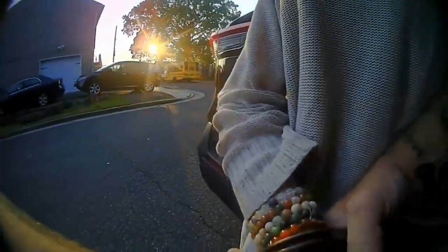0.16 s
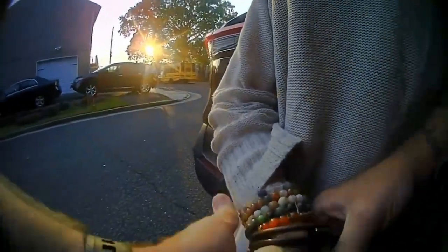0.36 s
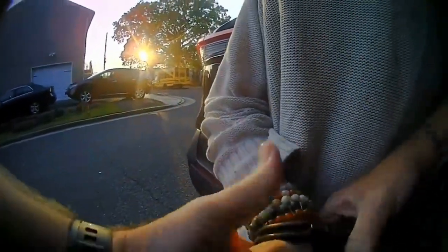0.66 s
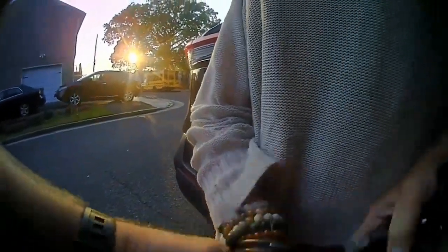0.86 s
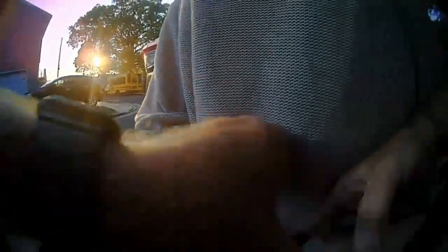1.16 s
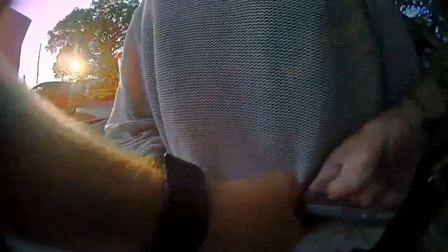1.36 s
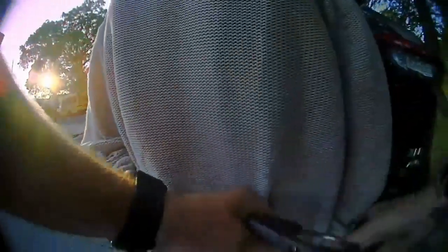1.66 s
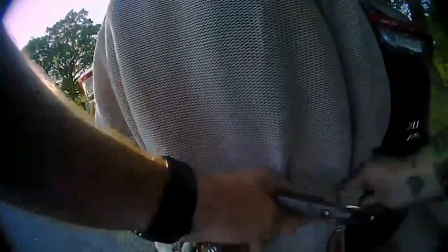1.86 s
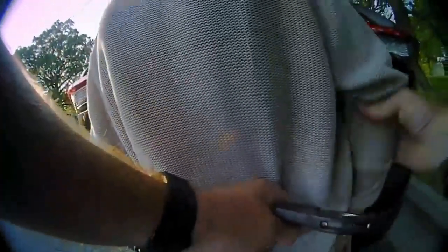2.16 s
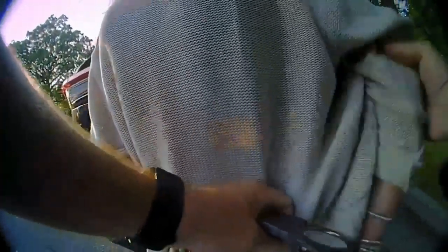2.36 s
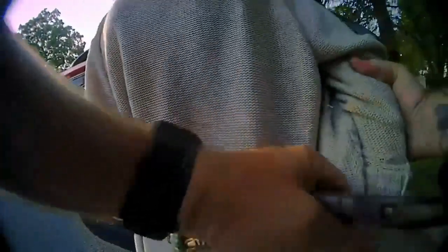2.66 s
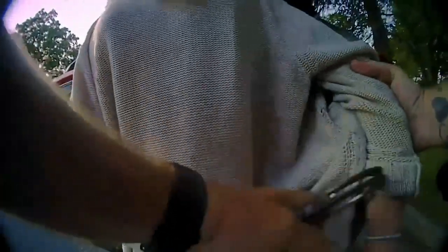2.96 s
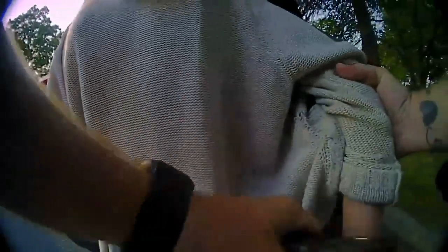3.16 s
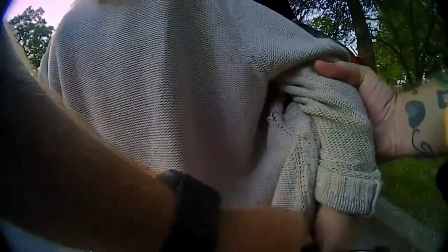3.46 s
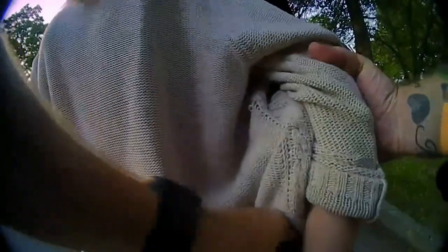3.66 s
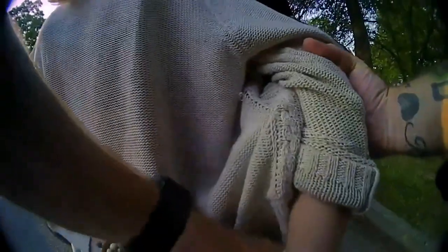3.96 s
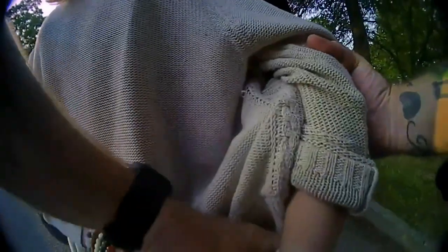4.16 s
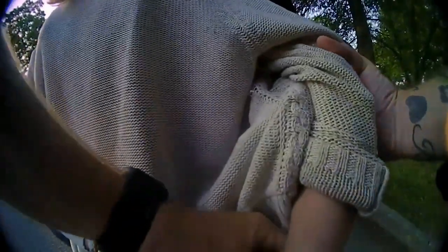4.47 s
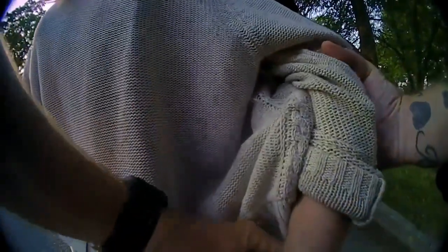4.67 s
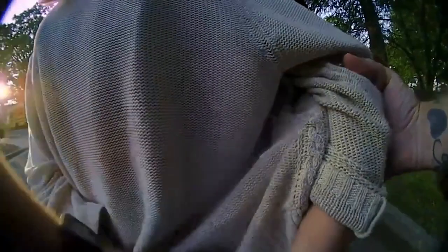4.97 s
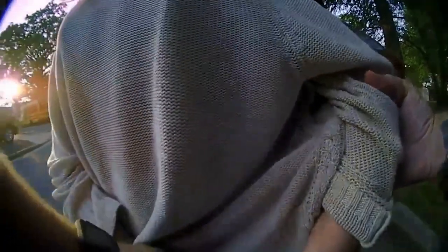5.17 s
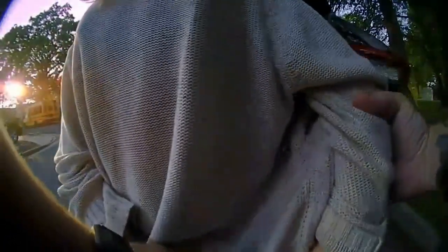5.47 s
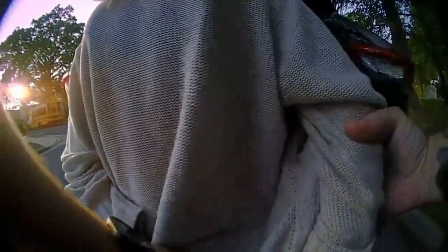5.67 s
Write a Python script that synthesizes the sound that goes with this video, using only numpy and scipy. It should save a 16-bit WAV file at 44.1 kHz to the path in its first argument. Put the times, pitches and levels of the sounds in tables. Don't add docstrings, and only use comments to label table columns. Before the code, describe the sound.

Close, bright metal ratcheting snaps over faint traffic, followed by a jingling chain, a lock click, tapping buckles and tiny bird chips.

```python
import sys
import numpy as np
from scipy import signal
from scipy.io import wavfile
from scipy.ndimage import uniform_filter1d, minimum_filter1d

SR = 44100
rng = np.random.default_rng(int(sys.argv[2]) if len(sys.argv) > 2 else 0)


def level_to_linear(level):
    exponent = np.asarray(level, float) / 20
    return 10 ** exponent


def put_to_file(sound):
    columns = np.atleast_2d(sound).T
    safe = np.clip(columns, -1, 1)
    whole_steps = np.round(safe * 32767)
    wavfile.write(sys.argv[1], SR, whole_steps.astype(np.int16))


N = 256431
NOW = np.arange(N) / SR

# f/Hz, level/dB, t60/s
STEEL_MID = [(3620, -16.5, 0.014), (3920, -23, 0.0017), (4400, -6.5, 0.011), (5320, -1.5, .006),
             (6180, 2.5, 0.0023), (7400, -12, 0.0068)]
STEEL_TOP = [(9400, -1.5, 0.0019), (11900, -3.5, 0.0092), (11550, -1, 0.0012), (11830, -24.5, .025),
             (13200, -9, 0.0017), (15000, -3.5, 0.0013), (15260, -3, 0.0045)]
# start t/s, end t/s, rms level/dB
SLIDES = [
    (2.117, 2.184, -45),
    (2.333, 2.347, -25.5),
    (2.806, 2.905, -37.5),
]


def rms_one(x):
    return x / np.sqrt(np.mean(x ** 2) + 1e-20)


def in_time(rows):
    s, *columns = np.transpose(rows)
    return [np.interp(NOW, s, c) for c in columns]


def passages(rows, fade):
    on = sum(level_to_linear(level_db) * (NOW > start) * (NOW < end) for start, end, level_db in rows)
    return uniform_filter1d(on, size=fade)


def band_pass(x, order, low_hz, high_hz):
    return signal.sosfilt(signal.butter(order, [low_hz, high_hz], "band", fs=SR, output="sos"), x)


def small_source(x, hz):
    return signal.sosfilt(signal.butter(3, hz, "high", fs=SR, output="sos"), x)


def add(out, s, sound, peak_db):
    i = round(s * SR)
    out[i:i + len(sound)] += (level_to_linear(peak_db) * sound / np.abs(sound).max())[:N - i]


def drift(rate):
    r = np.exp(-80 * np.pi * rate / SR)
    chance = rng.standard_normal(N // 40 + 2002)
    slow = signal.lfilter([1], [1, -2 * r, r * r], chance)[2000:]
    return np.interp(np.arange(N) / 40, np.arange(len(slow)), rms_one(slow))


def narrow_noise(hz, width_hz):
    r, w = np.exp(-np.pi * width_hz / SR), 2 * np.pi * hz / SR
    poles = [1, -2 * r * np.cos(w), r * r]
    once = signal.lfilter([1, 0, -1], poles, rng.standard_normal(N))
    return rms_one(signal.lfilter([1, 0, -1], poles, once))


def banded_noise(spectrum, patchy_db, source):
    hz, level_db = np.transpose(spectrum)
    edges = hz[0] * 2 ** np.arange(0, np.log2(hz[-1] / hz[0]) + .01, 1 / 3)
    out, together = 0, drift(4.95)
    for k, (low, high) in enumerate(zip(edges, edges[1:])):
        band = band_pass(source[k % 2], 2, low, high)
        centre_db = np.interp(np.log(low * high) / 2, np.log(hz), level_db)
        flicker_db = patchy_db * (1.15 * together + drift(23.0))
        out = out + level_to_linear(centre_db + flicker_db) * band
    return rms_one(out)


def fibres(per_s, spread_db, share):
    born = rng.random(N) < per_s * level_to_linear(4.0 * drift(15.0)) / SR
    sizes = born * level_to_linear(spread_db * np.minimum(rng.exponential(1, N), 3))
    decay = np.exp(-1 / (.0013 * SR))
    crackle = signal.lfilter([1], [1, -decay], sizes) * rng.standard_normal((2, N))
    return rng.standard_normal((2, N)) + share * rms_one(crackle)


def modes(table, t):
    spread_db, detune = 2.0, .015
    hz, level_db, t60 = np.transpose(table)[:, :, None]
    luck = rng.standard_normal((2, len(table), 1))
    fall_db = level_db + spread_db * luck[0] - 60 * t / t60
    return (level_to_linear(fall_db) * np.sin(2 * np.pi * hz * (1 + detune * luck[1]) * t)).sum(0)


def rattle(t, ms, lead_db, strike):
    since = t - .002
    swell = level_to_linear(lead_db) * np.exp(np.minimum(since, 0) / .0012)
    swarm = np.exp(-(np.maximum(since, 0) / (np.clip(ms, .3, 6) / 1000)) ** 1.5)
    hits = rng.standard_normal(len(t)) * np.where(since < 0, swell, swarm)
    hits[np.argmax(since >= 0)] = strike
    return hits


def ticks(table, top_db):
    out, t = np.zeros(N), np.arange(800) / SR
    for s, peak_db, hz in table:
        own = [(hz, 0, .005), (hz * .7, -6, .004), (hz * 1.17, -6, .004),
               (2500, -9, .003), (4750, -4, .005), (6800, -12, .003)]
        body = modes(own, t) + level_to_linear(top_db) * modes(STEEL_TOP, t)
        touch = signal.fftconvolve(rattle(t, 1.6, -25, 3.5), body)[:len(t)]
        add(out, s - .0015, small_source(touch, hz * 0.84), peak_db - 4.5)
    return out


def traffic():
    # f/Hz, density level/dB
    spectrum = [(12, -48.5), (20, -2.5), (103, -5.5), (223, 0), (339, -8), (418, -4), (585, -10),
                (818, -11), (947, -14.5), (1240, -16), (1810, -21), (2060, -19), (3000, -25), (3900, -72),
                (6600, -120)]
    # t/s, level/dB
    strength = [(0, -45.5), (0.7, -47.5), (1.6, -46.5), (3.6, -47), (4.0, -44), (4.98, -42.5), (5.34, -44),
                (5.81, -42.5)]
    # f/Hz, width/Hz, level/dB relative to the traffic
    whine_bands = [(834, 60, -17), (1239, 96, -18.5), (2683, 27, -27), (3423, 84, -23.5)]
    hum = banded_noise(spectrum, 1.52, rng.standard_normal((2, N)))
    whines = sum(level_to_linear(db + 1.0 * drift(2.3)) * narrow_noise(hz, width_hz) for hz, width_hz, db in whine_bands)
    return level_to_linear(in_time(strength)[0]) * (hum + whines)


def drone():
    # t/s, level/dB
    boom = [(4.3, -85), (4.55, -46), (4.75, -40.5), (5.0, -46.5), (5.2, -50.5), (5.5, -76), (5.81, -63)]
    return (NOW > boom[0][0]) * level_to_linear(in_time(boom)[0]) * narrow_noise(222, 63)


def whistle():
    # start t/s, end t/s, rms level/dB
    calls = [
        (2.526, 2.76, -72),
        (3.33, 3.62, -61.5),
        (4.13, 4.33, -71),
    ]
    return passages(calls, 2000) * narrow_noise(3415, 120)


def bird():
    # start t/s, peak level/dB
    chips = [(5.049, -44.5), (5.231, -45.5), (5.409, -48), (5.570, -45), (5.746, -44)]
    from_hz, to_hz, length_s = 7700, 4700, .015
    out, part = np.zeros(N), np.linspace(0, 1, int(length_s * SR))
    hz = to_hz + (from_hz - to_hz) * (1 - part) ** 1.2
    note = np.sin(2 * np.pi * np.cumsum(hz) / SR) * np.sin(np.pi * part ** 2.0)
    for s, peak_db in chips:
        add(out, s, note, peak_db)
    return out


def shivers():
    # centre t/s, half length t/s, added level/dB
    lifts = [
        (.1, 0.057, 3.5),
        (3.622, 0.06, 12),
        (4.773, 0.1, 9),
    ]
    return sum(db * np.exp(-((NOW - s) / half) ** 2) for s, half, db in lifts)


def cloth():
    # t/s, level/dB
    movement = [(0.0, -48), (0.16, -47), (0.29, -57.5), (0.52, -56.5), (0.7, -47.5), (0.94, -55),
                (2.08, -55.5), (2.2, -38), (2.45, -49.5), (3.1, -61.5), (3.38, -49.5), (3.5, -57),
                (3.61, -45.5), (3.92, -54), (4.45, -54), (4.74, -49), (4.99, -51), (5.3, -57.5),
                (5.81, -48)]
    # f/Hz, density level/dB
    rustle_bands = [(880, -42), (1500, -22), (2420, 8.5), (2670, -34), (2900, 16.5), (3320, -0.5),
                    (3720, 3), (5020, 9), (5610, -1), (9000, -35), (11700, -34), (19800, -120)]
    # f/Hz, density level/dB
    hiss_bands = [(3820, -20), (6500, -13), (9520, -4), (10300, -7.5), (12200, -24.5), (15000, 10.5),
                  (16200, -13), (16500, -32)]
    move_db, rub = in_time(movement)[0], fibres(300, 4.5, 0.62)
    rustle = level_to_linear(move_db) * banded_noise(rustle_bands, 1.6, rub)
    hiss_db = -61 + 0.63 * (move_db - move_db.mean()) + shivers()
    return rustle + level_to_linear(hiss_db) * banded_noise(hiss_bands, 1.4, rub)


def drags():
    # start t/s, end t/s, rms level/dB
    strokes = [
        (.08, .17, -56),
        (4.9, 5.02, -51.5),
        (5.682, 5.703, -45.5),
        (5.752, 5.808, -46.5),
    ]
    grain = band_pass(fibres(400, 3.5, 1.8)[0], 2, 2400, 5300)
    return passages(strokes, 400) * rms_one(grain)


def bump():
    # t/s, thud level/dB, scuff level/dB
    brush = [(1.356, -34, -88), (1.362, -46, -21), (1.373, -32.5, -49), (1.406, -44.5, -25.5),
             (1.43, -49, -41)]
    before, after = (brush[0][0] - .002, -90, -90), (brush[-1][0] + 0.064, -90, -90)
    thud_db, scuff_db = in_time([before] + brush + [after])
    thud = band_pass(rng.standard_normal(N), 1, 150, 620)
    scuff = band_pass(fibres(300, 2.3, 0.48)[0], 2, 1800, 6800)
    return level_to_linear(thud_db) * rms_one(thud) + level_to_linear(scuff_db - 13) * rms_one(scuff)


def beads():
    # t/s, peak level/dB, centre f/Hz
    touches = [(0.0384, -20.5, 5560), (0.0697, -21.5, 5400), (0.1013, -27, 5200), (0.1358, -27, 2160),
               (0.189, -25.5, 4300), (0.3552, -36, 4520), (0.6175, -30.5, 4900), (0.6529, -39, 5390),
               (0.7595, -30, 5060), (0.943, -34, 5540), (1.0385, -33, 4700), (1.046, -32, 5500),
               (1.054, -36, 5500), (1.1126, -29.5, 4220), (1.1591, -25.5, 4850), (1.3528, -7.5, 2960),
               (1.3773, -24, 2940), (1.4002, -22.5, 5100), (1.4871, -20.5, 4700), (1.68, -37, 5300),
               (1.7225, -34, 2700), (1.737, -31, 5930), (1.7459, -28, 4560), (1.781, -32, 4500),
               (1.8, -31, 4280), (1.8282, -30.5, 4900), (1.96, -16.5, 3120), (1.9934, -34, 3210),
               (1.476, -28.5, 1500), (2.058, -24.5, 5060)]
    return ticks(touches, -19)


def key_ring():
    # t/s, peak level/dB, centre f/Hz
    glints = [(.012, -27, 5200), (.027, -35, 5000), (.89, -38, 6000), (1.21, -37, 6000), (1.468, -32, 6500),
              (1.507, -36, 6000), (1.883, -36, 5000), (3.5392, -39, 6000), (3.5707, -24, 6000),
              (4.596, -30, 5200), (4.787, -27, 5310), (4.7994, -16.5, 5230), (4.8425, -29, 6000),
              (4.8565, -29, 6000)]
    return ticks(glints, -3)


def chain():
    # t/s, peak level/dB, centre f/Hz
    links = [(2.225, -28, 4130), (2.3596, -25, 4460), (2.3712, -30, 4550), (2.4325, -39, 5470),
             (2.4975, -26, 4370), (2.547, -38, 5100), (2.617, -31.5, 5330), (2.626, -32, 5300),
             (2.7372, -33.5, 3740), (3.4036, -37, 4700), (3.5895, -20.5, 4930), (3.6065, -16, 5140),
             (3.6114, -15, 5050), (3.619, -19, 5000), (3.6287, -23, 5300), (3.6354, -20, 4850),
             (3.6525, -25, 5340), (3.696, -23, 5040), (3.7153, -15, 4900), (3.742, -23.5, 5220),
             (3.7832, -28, 5100), (3.808, -27, 4900), (3.8356, -31, 2900), (3.9434, -29, 3300),
             (3.987, -31, 4800), (4.0103, -31, 1060), (4.0756, -32, 4450)]
    return ticks(links, -14)


def buckles():
    # t/s, peak level/dB, centre f/Hz
    taps = [(4.3378, -37, 1690), (4.38, -32, 4360), (4.4208, -35, 4930), (4.4322, -28, 4680),
            (4.596, -40, 1210), (4.683, -28, 5100), (4.706, -23.5, 2120), (4.7152, -13.5, 4430),
            (4.7212, -16.5, 4940), (4.73, -26, 4400), (4.7606, -23.5, 5000), (4.926, -28, 4400),
            (4.935, -27, 4400), (5.0781, -29.5, 1200), (5.326, -20, 1300), (5.5474, -22.5, 950),
            (5.5496, -23, 2030), (5.6388, -30, 2460), (5.6593, -28, 2614), (5.7273, -26, 5400),
            (5.728, -21.5, 1300)]
    return ticks(taps, -23)


def slides():
    t = np.arange(600) / SR
    ring = modes(STEEL_MID, t) + level_to_linear(-3.0) * modes(STEEL_TOP, t)
    rub = signal.fftconvolve(rng.standard_normal(N), ring)[:N]
    return small_source(passages(SLIDES, 200) * rms_one(rub), 2400)


def ratchet():
    # t/s, peak level/dB, brightness level/dB, main ring f/Hz
    first_swing = [(2.0848, 1, 0, 4700), (2.1082, -3.5, 1.5, 4640), (2.126, -5, 2.5, 4640),
                   (2.141, -7.5, -0.5, 4470), (2.1513, -7, -10, 5020), (2.1586, -5.5, -12, 4620)]
    rebound = [(2.3262, -13.5, -28, 4730), (2.333, -13, -6.5, 4220), (2.338, -10, -6, 4570),
               (2.3399, -4.5, 2, 4870), (2.346, -7.5, -10.5, 4640)]
    second_swing = [(2.7841, -16, -22.5, 4850), (2.7858, -1, -4, 4830), (2.7968, -2, -4, 4880),
                    (2.8118, -10, -11, 4960), (2.8227, -2.5, -2.5, 4920), (2.8337, -7, -4, 4900),
                    (2.8423, -3, 2, 4980), (2.8515, -6.5, 1, 4820), (2.8617, -2, 1.5, 4970),
                    (2.8694, -6, 5, 4520), (2.8768, -6.5, -4.5, 4930), (2.885, -3, 9, 4290),
                    (2.8951, -5.5, 1.5, 4870), (2.9116, -1.5, 1.5, 4310), (2.9206, -3.5, 7.5, 4370),
                    (2.9417, -1, 3.5, 4790), (2.9648, -7, -4.5, 4680), (2.9878, -5, -1.5, 4200),
                    (3.0404, -2.5, -11, 4840), (3.1650, -11, -16, 4800), (3.3343, -20, -17, 4840)]
    lock = [
        (4.1061, -17, -24, 4445),
        (4.1077, -6, -12, 4445),
    ]
    # f/Hz, level/dB, t60/s
    steel_low = [(694, 1.5, 0.0014), (1750, -34, 0.0066), (2020, 0.5, 0.015), (2700, 9.5, 0.0064)]
    out, t, before = np.zeros(N), np.arange(2000) / SR, 0
    for s, peak_db, top_db, hz in first_swing + rebound + second_swing + lock:
        low_db = -10 - 14 * np.exp(-((s - before) / .17) ** 2)
        tail = level_to_linear(-21) * rng.standard_normal(len(t)) * level_to_linear(-60 * t / 0.047) * (t > .002)
        rebounds_ms = .5 if s >= lock[0][0] else 2.3
        blows = rattle(t, rebounds_ms, -15, 7.9) + tail
        mid, top, low = (rms_one(signal.fftconvolve(blows, modes(group, t))[:len(t)])
                         for group in (STEEL_MID + [(hz, 7, .008)], STEEL_TOP, steel_low))
        snap = small_source(mid + level_to_linear(top_db) * top, 2800) + level_to_linear(low_db) * small_source(low, 1100)
        add(out, s - .002, snap, min(peak_db, 0))
        if peak_db > -14:
            before = s
    return out


def gain_control():
    # t/s, depth level/dB
    ducks = [(2.086, 15), (2.16, 24.5), (2.341, 20.5), (2.498, 17.5), (2.787, 30.5), (3.041, 22.5),
             (3.165, 13), (3.335, 9.5), (4.108, 17.5)]
    hold_s, recover_db_per_s, run_duck_db, fall_s = 0.023, 38, 9, .006
    s, depth_db = np.transpose(ducks)[:, :, None]
    recovered_db = recover_db_per_s * np.maximum(NOW - s - hold_s, 0)
    down = (NOW > s) * (depth_db - recovered_db)
    running = sum((NOW > start) * (NOW < end) for start, end, _ in SLIDES[::2])
    return -uniform_filter1d(np.maximum(down.max(0), 0) + run_duck_db * running, size=int(fall_s * SR))


def scene():
    background = level_to_linear(gain_control()) * (traffic() + cloth())
    far = drone() + whistle() + bird()
    near = drags() + bump() + beads() + key_ring() + chain() + buckles()
    return (background + far + near + slides() + ratchet())[None]


def thin_low_middle(x):
    # start t/s, end t/s
    runs = [
        (2.132, 2.176),
        (2.806, 2.903),
    ]
    # lower f/Hz, upper f/Hz
    band_hz = [180, 900]
    busy = uniform_filter1d(sum(1. * (NOW > start) * (NOW < end) for start, end in runs), size=200)
    low_middle = signal.sosfiltfilt(signal.butter(4, band_hz, "band", fs=SR, output="sos"), x)
    return x - .9 * busy * low_middle


def top_cut(x):
    return signal.sosfilt(signal.butter(12, 17030, fs=SR, output="sos"), x)


def record(dry):
    rumble = band_pass(rng.standard_normal(N), 1, 16, 130)
    self_noise = level_to_linear(-85) * rng.standard_normal(N)
    wet = np.tanh(dry + level_to_linear(-62.5) * rms_one(rumble) + self_noise)
    wide, below = (signal.sosfiltfilt(signal.cheby2(10, 40, hz, fs=SR, output="sos"), wet)
                   for hz in (16900, 16250))
    peak = -minimum_filter1d(-np.abs(wet), size=300)
    loud = peak > level_to_linear(-22)
    kept = below + level_to_linear(-13.5) * loud * (wide - below)
    return top_cut(thin_low_middle(kept))


dry = scene()
out = record(dry)
put_to_file(out)
```